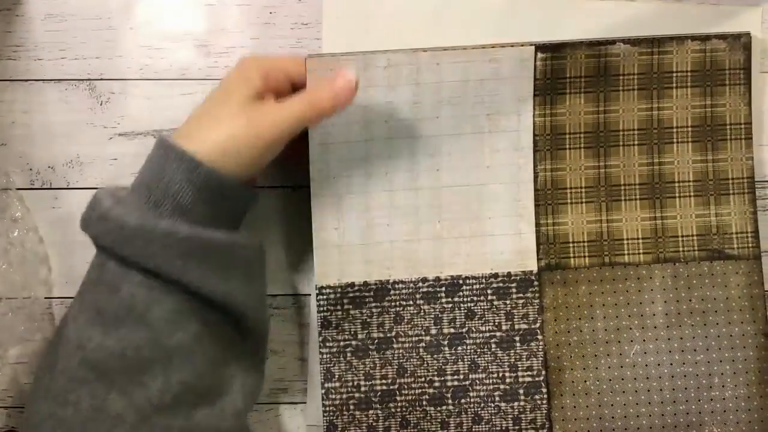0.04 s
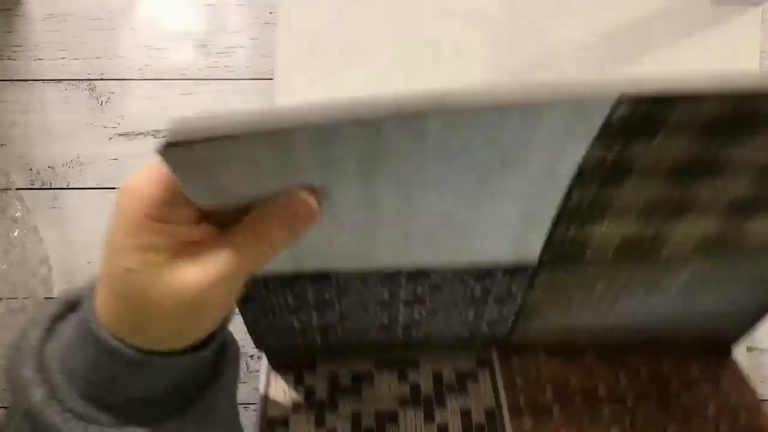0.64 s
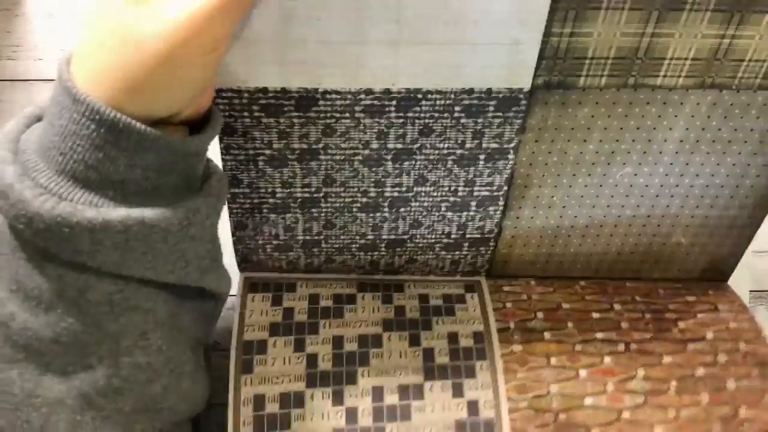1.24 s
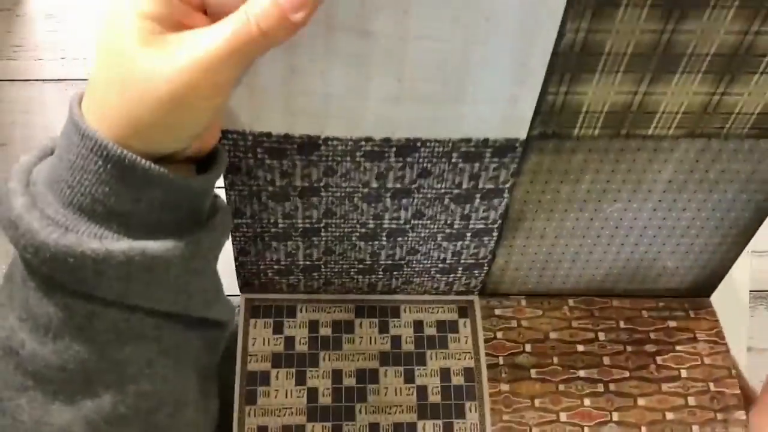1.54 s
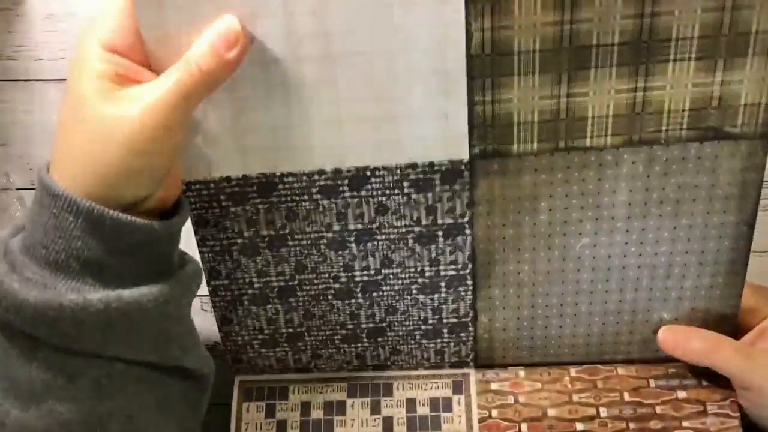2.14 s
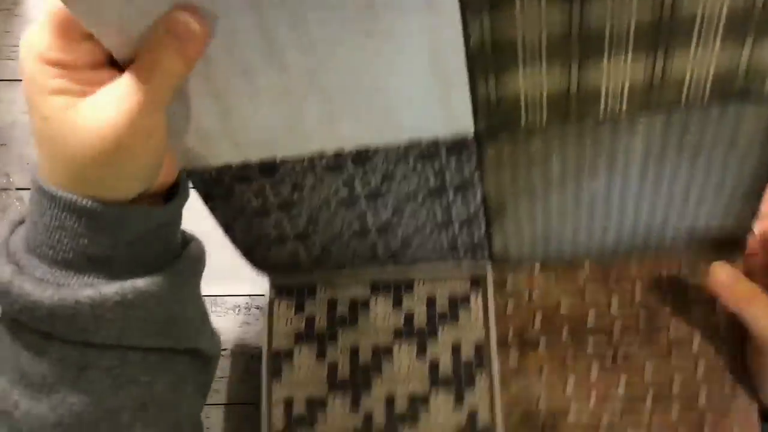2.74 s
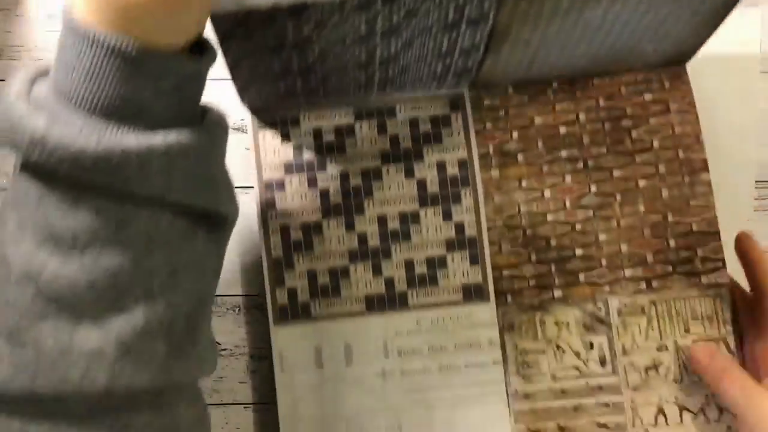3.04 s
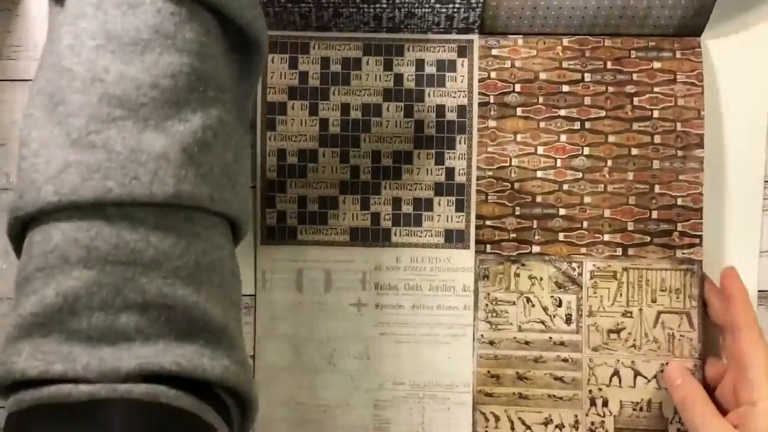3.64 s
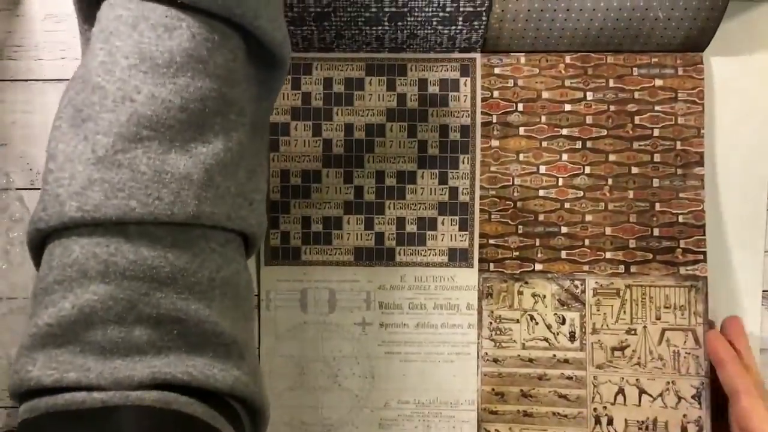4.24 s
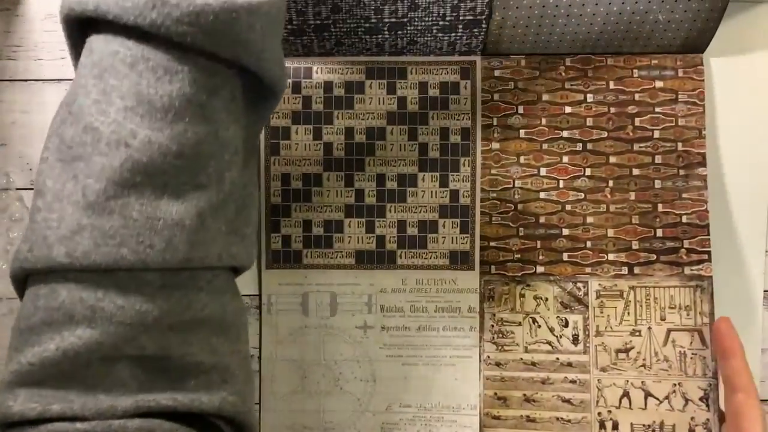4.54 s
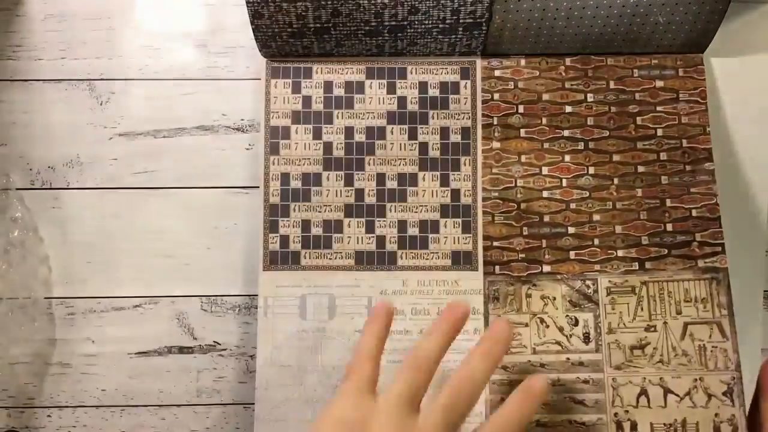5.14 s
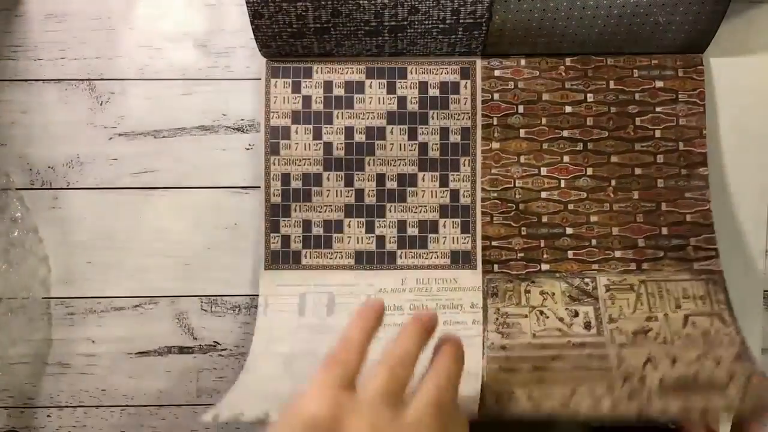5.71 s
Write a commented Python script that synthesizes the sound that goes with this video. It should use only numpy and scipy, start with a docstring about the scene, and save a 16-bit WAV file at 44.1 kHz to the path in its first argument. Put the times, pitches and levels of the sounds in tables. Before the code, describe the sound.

Large stiff paper sheets are lifted and folded back on a table, with soft sliding, hollow knocks and small snaps.

```python
"""Large stiff sheets of a paper pad are lifted, folded back and smoothed on a table, close by in a small room.
First sheet slides on sheet with a soft friction noise. Near 0.75 s the paper buckles: bending waves make
the loudest hollow knock, edges snap and the sheet flutters. More knocks and brief stick-slip chirps
follow, then a firm slide near 2.8 s and another cluster of knocks near 3.7 s. From 4.3 s a hand or
sleeve brushes the paper smooth, among lighter knocks and ticks."""
import sys
import numpy as np
from scipy import signal
from scipy.fft import rfft, irfft, next_fast_len
from scipy.io import wavfile
from scipy.ndimage import uniform_filter1d, map_coordinates

SR = 44100
rng = np.random.default_rng(int(sys.argv[2]) if len(sys.argv) > 2 else 0)


def digitize_waveform(pressure):
    """Quantize a signal to 16-bit integers and store it at the path in sys.argv[1].

    Rows of a 2-D input are taken as channels; values are limited to [-1, 1].
    """
    field = np.atleast_2d(pressure).T
    bounded = np.clip(field, -1, 1)
    quanta = np.round(bounded * 32767).astype(np.int16)
    wavfile.write(sys.argv[1], SR, quanta)


N = 263541


def amp(db):
    """Decibels to amplitude ratio."""
    return 10 ** (np.asarray(db) / 20)


def unit(x):
    """Normalisation to rms 1."""
    return x / np.sqrt(np.mean(x ** 2) + 1e-20)


def along(points, hz):
    """Interpolation of (Hz, value) points on a logarithmic frequency axis."""
    f, v = np.transpose(points)
    return np.interp(np.log(hz + 1), np.log(f + 1), v)


def wobble(rate):
    """Slow random modulation: a spline through `rate` knots a second."""
    knots = rng.standard_normal(int(N * rate / SR) + 4)
    return map_coordinates(knots, [np.arange(N) * rate / SR])


def filtered(x, response):
    """Linear filtering: the spectrum of x times a frequency response."""
    size = next_fast_len(len(x) + 8192)
    return irfft(rfft(x, size) * response(np.fft.rfftfreq(size, 1 / SR)), size)[:len(x)]


def coloured(x, spectrum):
    """Spectral shaping by (Hz, dB) points, at rms 1."""
    return unit(filtered(x, lambda hz: amp(along(spectrum, hz))))


def add(track, start_s, sound):
    """Superposition: a sound joins the track at its start time."""
    start = max(round(start_s * SR), 0)
    part = track[start:start + len(sound)]
    part += sound[:len(part)]


# The still room's spectrum. Each row: frequency in Hz, relative density in dB.
HUSH_SPECTRUM = [(30, -25), (60, -1.5), (100, -2.5), (200, -8.5), (310, -6.5), (600, -7.5), (1500, -17),
                 (4000, -23), (8000, -33), (15500, -35.5)]
def room_tone():
    """Stationary noise: the steady hush of room and microphone."""
    return amp(-66) * coloured(rng.standard_normal(N), HUSH_SPECTRUM)


# The room's decay. Each row: frequency in Hz, time to fall 60 dB in seconds.
ROOM_DECAY = [(100, 0.89), (300, 0.14), (1000, 0.12), (4000, 0.067), (12000, 0.079)]
def reverberation(x):
    """Reflections arrive after a short delay and decay exponentially, the treble first."""
    hz, t, bands = signal.stft(rng.standard_normal(SR // 2), SR, nperseg=256)
    tail = signal.istft(bands * amp(-60 * t / along(ROOM_DECAY, hz)[:, None]), SR, nperseg=256)[1]
    delayed = np.pad(x, (round(0.0065 * SR), 0))
    return signal.fftconvolve(delayed, tail / np.linalg.norm(tail))[:N]


def drifting(x, depth_db):
    """Radiation efficiency: as the sheet bends, the bands it radiates best keep shifting."""
    bands = signal.stft(x, nperseg=512)[2]
    field = rng.standard_normal(bands.shape)
    for _ in range(2):
        field = uniform_filter1d(uniform_filter1d(field, size=4, axis=0), size=16, axis=1)
    return signal.istft(bands * amp(depth_db * unit(field)), nperseg=512)[1][:N]


def friction(spectrum, catches_per_s, grain_db, uneven_db):
    """Friction noise: fibres rub finely and catch at random, under uneven pressure."""
    grains = (rng.random(N) < catches_per_s / SR) * rng.standard_normal(N)
    force = drifting(rng.standard_normal(N) + amp(grain_db) * unit(grains), depth_db=1.53)
    pressure = amp(uneven_db * (wobble(25) + wobble(110)))
    return unit(coloured(force, spectrum) * pressure)


def strokes(rows, attack_s, t60_s):
    """Incoherent addition: stroke envelopes rise, hold and die, and overlaps sum in power."""
    power = np.zeros(N)
    for start, length, db, growth_db in rows:
        t = np.arange(round((length + t60_s) * SR)) / SR
        held_db = db + growth_db * (np.minimum(t / length, 1) - .5)
        fall_db = 60 * np.maximum(t - length, 0) / t60_s
        add(power, start, (np.minimum(t / attack_s, 1) * amp(held_db - fall_db)) ** 2)
    return np.sqrt(power)


# Sheet slides on sheet. Each row: start and length in seconds, rubbing level in dB, growth over the
# stroke in dB, then hiss, brushing and scraping in dB relative to the rubbing.
SLIDE_STROKES = [(-0.007, 0.32, -70, 2.5, 0.5, 3, -2), (0.343, 0.23, -63.5, 7, -1.5, -2, -1.5),
                 (0.55, 0.15, -58, -6.5, 0.5, -7, 0), (0.705, 0.11, -59.5, 3, -1.5, -13, 9),
                 (0.828, 0.22, -70, -5, -9, 0, 8.5), (1.069, 0.23, -63, -3, -6, 0, 6.5),
                 (1.419, 0.17, -63, -7, -6, -7.5, 5), (1.613, 0.19, -62.5, -5.5, -5.5, -2.5, 8.5),
                 (1.814, 0.11, -62, 2.5, -2, 2, 9.5), (1.934, 0.3, -64.5, 4.5, -10, -7, 3),
                 (2.295, 0.35, -64, -1.5, -8, -1.5, 4.5), (2.609, 0.22, -59, 1.5, -4.5, -2, 6.5),
                 (2.807, 0.15, -54, 5, -3.5, -1.5, 0), (2.944, 0.2, -61, -7.5, -3, -5, 1.5),
                 (3.15, 0.16, -63.5, -1, 0, -3, -6), (3.322, 0.17, -68.5, 12, -4.5, -4.5, -8.5),
                 (3.514, 0.16, -74.5, 6, 2.5, 0, -7), (3.649, 0.17, -65.5, 1, -3.5, 2, 8.5),
                 (3.899, 0.28, -71, 0.5, -5, 0.5, 2.5), (4.203, 0.21, -67, 1, -9, 1.5, -2),
                 (4.412, 0.16, -65.5, -10, -1, 0, 6.5), (4.552, 0.12, -67.5, 8, -7.5, 2, 13.5),
                 (4.695, 0.18, -69, -2.5, -18, -2, -8), (4.869, 0.25, -75, -2, 3, 5, -7),
                 (5.105, 0.074, -60, -3, -4.5, -5, -2.5), (5.203, 0.085, -72.5, 0, -3, 6, 8),
                 (5.599, 0.15, -67.5, 0.5, -4.5, -4, -1.5), (5.865, 0.089, -72.5, -6, -18, 11, 10.5)]
def slide_envelopes():
    """Amplitude modulation: one motion drives the rubbing, hiss, brushing and scraping."""
    start, length, db, growth_db, *relative_dbs = np.transpose(SLIDE_STROKES)
    return [strokes(zip(start, length, db + relative_db, growth_db), attack_s=0.034, t60_s=0.17)
            for relative_db in (0, *relative_dbs)]


# Spectra of paper on paper. Each row: frequency in Hz, relative density in dB.
SCRAPE_SPECTRUM = [(250, -17), (400, 2), (520, 4.5), (610, 5), (720, 0), (860, -1.5), (1100, -15),
                   (1700, -44)]
RUB_SPECTRUM = [(1500, -31), (2200, 1), (2600, 0), (3100, 3.5), (4000, 3), (4700, 0.5), (6000, -4.5),
                (10000, -19)]
HISS_SPECTRUM = [(2000, -35), (4500, -9), (6500, -7.5), (9500, -3), (12000, -9.5), (15500, -5.5)]
def sliding_sheets(rub_gain, hiss_gain, scrape_gain):
    """Sliding friction in three bands: a hollow scrape, a bright rub and a fine hiss."""
    scrape = scrape_gain * friction(SCRAPE_SPECTRUM, catches_per_s=150, grain_db=-9.5, uneven_db=2.24)
    rub = rub_gain * friction(RUB_SPECTRUM, catches_per_s=410, grain_db=-6, uneven_db=1.6)
    hiss = hiss_gain * friction(HISS_SPECTRUM, catches_per_s=410, grain_db=-5, uneven_db=0.8)
    return scrape + rub + hiss


# Spectra of brushed paper and its singing band. Each row: frequency in Hz, relative density in dB.
BRUSH_SPECTRUM = [(600, 1.5), (950, 4), (1150, 3.5), (1500, 3), (1950, 0.5), (2500, -11), (4000, -45)]
SING_SPECTRUM = [(2900, -33), (3450, -2.5), (3720, 3), (3950, -16), (4700, -30)]
# A hand or sleeve wipes the paper. Each row: start and length in seconds, brushing level in dB,
# singing band in dB relative to the brushing.
WIPE_STROKES = [(0.0, 0.032, -69, -17), (0.754, 0.081, -54.5, -16), (1.094, 0.046, -55.5, -25),
                (4.274, 0.62, -70, -8), (4.7, 0.21, -70.5, -2.5), (4.952, 0.13, -63, -7),
                (5.1, 0.18, -65.5, -2), (5.336, 0.022, -63, -10), (5.52, 0.46, -63, -14),
                (5.615, 0.028, -52.5, -4.5), (5.665, 0.027, -60.5, -16)]
def brushing(rub_gain, slide_brush_gain):
    """Friction of wipes and slides alike: a soft mid-band noise and a narrow band singing near 3.7 kHz."""
    brush_rows = [(start, length, db, 0) for start, length, db, _ in WIPE_STROKES]
    sing_rows = [(start, length, db + sing_db, 0) for start, length, db, sing_db in WIPE_STROKES]
    wipe, wipe_sing = (strokes(rows, attack_s=0.021, t60_s=0.12) for rows in (brush_rows, sing_rows))
    brush = friction(BRUSH_SPECTRUM, catches_per_s=230, grain_db=-12.5, uneven_db=2.1)
    sing = friction(SING_SPECTRUM, catches_per_s=540, grain_db=-4, uneven_db=4.0)
    return np.hypot(wipe, slide_brush_gain) * brush + np.hypot(wipe_sing, amp(-14) * rub_gain) * sing


# The swaying sheet's spectrum. Each row: frequency in Hz, relative density in dB.
FLUTTER_SPECTRUM = [(25, -45), (45, -7.5), (70, -3), (130, 2.5), (220, -4), (305, 5.5), (380, -5),
                    (520, -25.5), (900, -52)]
def flutter(rub_gain):
    """Forced and free vibration: the sheet sways while it slides and after each knock."""
    firm_knock_db, firm_shake_db, limit_db = -30, -55.5, -65.5
    shakes = [(start, 0.03, firm_shake_db + 0.51 * (db - firm_knock_db), 0) for start, db, *_ in BUCKLES]
    shaken = strokes(shakes, attack_s=0.016, t60_s=0.75)
    sway = amp(limit_db) * np.tanh(rub_gain * amp(7 - limit_db))  # the hands restrain it
    rumble = friction(FLUTTER_SPECTRUM, catches_per_s=69, grain_db=0, uneven_db=0.86)
    return np.hypot(shaken, sway) * rumble


# Paper sticks and slips. Each row: start in seconds, level in dB, slip rate in Hz, length in seconds,
# roughness from 0 to 1.
STICK_SLIPS = [(0.24, -45, 1690, 0.075, 0.25), (0.845, -45, 2680, 0.012, 0.2), (1.279, -56, 2140, 0.023, 0),
               (1.908, -30.5, 771, 0.015, 0.03), (1.948, -43, 2500, 0.016, 0.07),
               (4.278, -43.5, 1907, 0.044, 0.15)]
def chirps():
    """Stick-slip oscillation: regular slips make a harmonic chirp, irregular ones a rough scuff."""
    track = np.zeros(N)
    paper_response = [(700, -1), (1600, 6.5), (2400, 0), (3100, 8), (4300, -12.0), (5600, -8),
                      (7000, -48), (12000, -33)]  # Each pair: frequency in Hz, gain in dB.
    for start, db, slip_hz, length, roughness in STICK_SLIPS:
        count = round(length * SR)
        phase = 2 * np.pi * np.cumsum(slip_hz * (1 + roughness * wobble(1500)[:count])) / SR
        tone = sum(amp(along(paper_response, k * slip_hz)) * np.sin(k * phase) for k in range(1, 7))
        add(track, start, amp(db - 12.0) * unit(tone) * np.hanning(count))
    return track


# The spectrum of cracking fibres. Each row: frequency in Hz, relative density in dB.
CRACK_SPECTRUM = [(300, 5.5), (900, 12.5), (1700, 3), (2600, 3), (3700, 6), (6000, 0), (10000, -2.5),
                  (16000, -3.5)]
# An edge or crease snaps. Each row: time in seconds, level in dB, treble tilt in dB, time to fall
# 60 dB in seconds.
EDGE_SNAPS = [(0.4523, -39, -12, .06), (0.5657, -31, -10, 0.057), (0.7516, -38, -15, 0.017),
              (0.7684, -25.5, -5.5, 0.03), (0.7926, -30, -30, .017), (1.1127, -43, -1, 0.026),
              (1.4485, -39.5, -14, 0.074), (2.0546, -29.5, -9, 0.026), (2.0773, -37, 0, 0.026),
              (2.1872, -44, -10, 0.055), (2.2374, -33, -13, 0.043), (2.3993, -38, -16, 0.018),
              (2.422, -35.5, -5, 0.028), (2.632, -41, -34, 0.022), (2.7477, -35, -12, 0.021),
              (3.662, -39.5, -30, 0.015), (3.6806, -32.5, -16, 0.02), (3.712, -41, -12, 0.026),
              (3.7334, -30, -24, 0.081), (3.773, -33, -44, .03), (4.0334, -43, -23, 0.037),
              (4.2885, -48, -5, 0.1), (4.371, -43.5, -17, 0.018), (4.4254, -35, -7, 0.025),
              (4.5194, -39.5, -2, .02), (5.1415, -44, 3, 0.022), (5.2648, -42.5, -34, .04),
              (5.2831, -38, -18, 0.027), (5.683, -45, -9, 0.11), (5.7252, -42, -11, 0.043),
              (5.8376, -41.5, -28, .016)]
def snaps():
    """Sudden release: an edge slips free in a spray of fibre cracks that builds quickly and dies."""
    track, t = np.zeros(N), np.arange(SR // 6) / SR
    build_s, treble_share = .006, [(3000, 0.093), (10000, 1.0)]
    for time, db, tilt_db, t60 in EDGE_SNAPS:
        colour = lambda hz: amp(along(CRACK_SPECTRUM, hz) + (tilt_db + 5.0) * along(treble_share, hz))
        spray = unit(filtered(rng.standard_normal(len(t)), colour))
        envelope = np.minimum(t / build_s, 1) ** 2 * amp(-60 * np.maximum(t - build_s, 0) / t60)
        add(track, time - build_s / 2, amp(db - 9.5) * spray * envelope)
    return track


# The table top under the pad, with the held sheet's own line near 313 Hz. Each row: frequency in Hz, level in
# dB, time to fall 60 dB in seconds.
TABLE_MODES = [(126.8, -11.5, 0.29), (176.9, -1, 0.14), (204, -3, 0.19), (313.4, -10.5, 0.27)]
def table_ring(t):
    """Modal vibration: the table top and the sheet's strongest mode ring as a sum of damped sinusoids."""
    ring = sum(amp(db - 60 * t / t60) * np.sin(2 * np.pi * hz * t) for hz, db, t60 in TABLE_MODES)
    return ring * (1 - np.exp(-t / 0.01))


# The resonances a knock excites: low lines near 124 and 180 Hz from the table top, then the modes of the held
# sheet. Each row: frequency in Hz, bandwidth in Hz, gain in dB.
RING_MODES = [(124, 8.9, -21), (180, 61, 7.5), (294.6, 34, 5.5), (435, 160, 3.5), (615, 130, 7),
              (850, 190, -8.5)]
def hollow_ring(wave, t, t60_s=0.08):
    """Resonance: waves reflected between the sheet's edges excite its modes and the table's low lines."""
    bounces = rng.standard_normal(len(t)) * amp(-60 * t / t60_s) * (1 - np.exp(-t / 0.0023))
    reflected = signal.fftconvolve(wave, bounces / np.linalg.norm(bounces))[:len(t)]
    response = lambda f: sum(amp(db) * 1j * f * width / (hz ** 2 - f ** 2 + 1j * f * width)
                             for hz, width, db in RING_MODES)
    return filtered(reflected, response)


def bending_wave(t, hz, swell_cycles, lag_cycles, sweep):
    """Dispersion: slow low waves arrive late, so the packet falls in pitch as it swells and dies."""
    cycles = np.maximum(hz * t - lag_cycles, 0)
    age = cycles / swell_cycles
    return age * np.exp(1 - age) * np.sin(2 * np.pi * (cycles + sweep * (1 - np.exp(-age))))


# A sheet buckles or is set down. Each row: time in seconds, level in dB, low and high wave frequencies
# in Hz, then relative levels in dB of the high wave, the bass and the edge's tick.
BUCKLES = [(0.451, -39.5, 554, 540, -13, -7, -2), (0.495, -42.5, 193, 503, -2, -3, -24),
           (0.568, -41.5, 420, 845, 1, -23, 1), (0.585, -42.5, 487, 605, 2, -27, -14),
           (0.719, -38, 445, 567, -7, -23, -0.5), (0.752, -17, 328, 539, -8, -21, -15.5),
           (0.763, -21.5, 300, 710, -9.5, -28, -29), (0.792, -26.5, 310, 594, -10.5, -19, 0.5),
           (0.805, -25, 297, 606, -23, -20, -32), (0.824, -35, 179, 662, -14, -15, -30),
           (1.124, -28.5, 300, 580, -10.5, -23, -24), (1.134, -30, 305, 557, -13, -7, -35),
           (1.394, -36.5, 453, 800, -5, -9.5, -15), (1.416, -23, 354, 828, 2.5, -42, -35),
           (1.451, -33, 412, 727, -4.5, -35, -32), (1.7, -39.5, 415, 680, -13, -22, -15),
           (1.807, -47.5, 640, 894, -2, -30, -2), (1.868, -42.5, 296, 486, -8, -9, -14),
           (2.07, -31, 271.5, 540, -13.5, -10, -36), (2.188, -50, 300, 582, 3.5, -24, -10),
           (2.239, -43, 497, 547, -2, -20, -14), (2.328, -35, 292, 503, -15, -9, -32),
           (2.402, -31, 340, 815, -0.5, -18, -29), (2.411, -40.5, 298, 655, 3.5, -17, -26),
           (2.434, -29, 496, 823, -5.5, -26, -28), (2.447, -35, 520, 760, -5, -37, -28),
           (2.635, -40, 206, 564, -3.5, -2, 10), (3.122, -41.5, 325, 605, -3.5, -3, -27),
           (3.489, -40, 313, 590, -14.5, -10, -12), (3.664, -38.5, 519, 827, 1, -3.5, -2),
           (3.682, -34, 286, 590, -22, -12, -24), (3.737, -28.5, 310, 535, -5, -17, -25),
           (3.745, -35.5, 176, 613, -4, -7, -20), (3.77, -36.5, 320, 657, -10, -15, -17),
           (3.802, -35.5, 297, 530, -12, -3, -8), (3.898, -55.5, 150, 980, 8, 0, 16),
           (4.036, -46.5, 380, 505, -6.5, -17, -25), (4.422, -44, 320, 557, -7, -7, -2),
           (4.586, -40.5, 314, 607, -5, -5, -16), (4.624, -42.5, 323, 520, 0.5, -3, -22),
           (4.647, -37, 314, 592, -12, -8.5, -19), (5.268, -54, 540, 675, 10.5, -6, 12),
           (5.285, -48, 502, 745, 1, -17, -7), (5.838, -52.5, 322, 620, 0.5, -6, 14.5)]
def knocks():
    """Buckling launches bending waves, rings the sheet, pushes air from under it and shakes the table."""
    track, t = np.zeros(N), np.arange(SR // 3) / SR
    table = table_ring(t)
    air_puff = bending_wave(t, hz=65.2, swell_cycles=0.48, lag_cycles=0.89, sweep=0.46)
    for time, db, low_hz, high_hz, high_db, bass_db, edge_db in BUCKLES:
        low = bending_wave(t, low_hz, swell_cycles=1.016, lag_cycles=0.74, sweep=0.16)
        high = bending_wave(t, high_hz, swell_cycles=1.76, lag_cycles=0.047, sweep=0.1)
        tick_hz = 1420 * np.exp(0.16 * rng.standard_normal())
        tick = bending_wave(t, tick_hz, swell_cycles=1.0, lag_cycles=0.3, sweep=0.36)
        wave = low + amp(high_db + 0.5) * high + amp(edge_db - 6) * tick + amp(bass_db - 4) * air_puff
        knock = wave + amp(-11) * hollow_ring(wave, t) + amp(bass_db + 2) * table
        add(track, time - .0012, amp(db) * knock)
    return track


def scene():
    """Superposition: knocks, snaps and chirps with their reverberation, over the rustle and the hush."""
    hits = knocks() + snaps() + chirps()
    reflections = amp(-15.5) * reverberation(hits)
    rub_gain, hiss_gain, brush_gain, scrape_gain = slide_envelopes()
    rustle = flutter(rub_gain) + sliding_sheets(rub_gain, hiss_gain, scrape_gain)
    rustle += brushing(rub_gain, brush_gain)
    return (hits + reflections + rustle + room_tone())[None]


def record(dry):
    """Band limiting: the microphone sheds the deepest bass and passes nothing above its upper limit."""
    low_cut_hz, top_hz = 46, 15870
    return filtered(dry[0], lambda hz: (hz < top_hz) * (1 - 1 / (1 + (hz / low_cut_hz) ** 8)))[None]


dry = scene()
out = record(dry)
digitize_waveform(out)
```